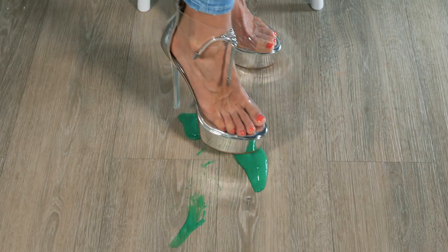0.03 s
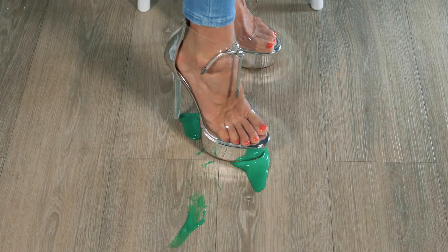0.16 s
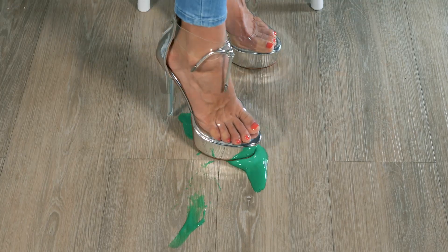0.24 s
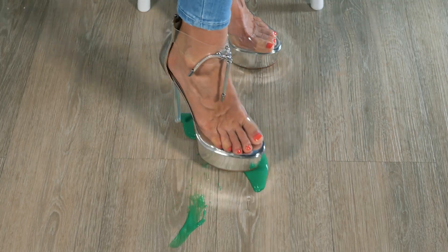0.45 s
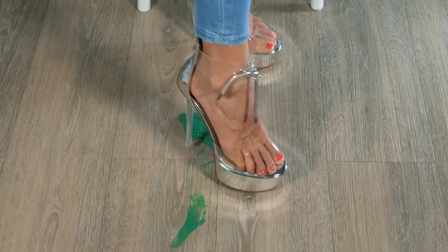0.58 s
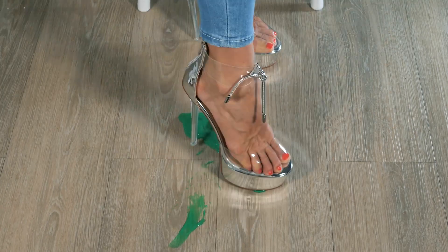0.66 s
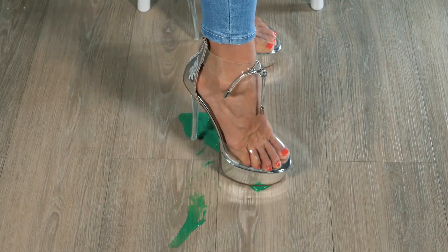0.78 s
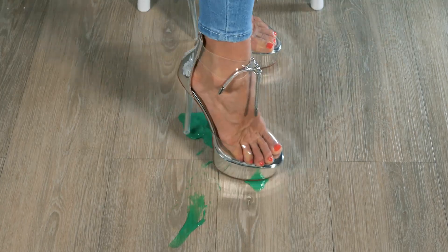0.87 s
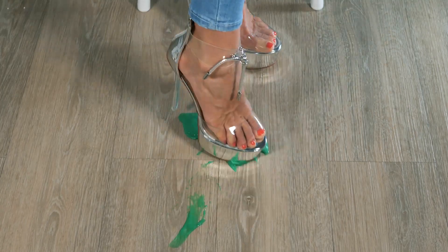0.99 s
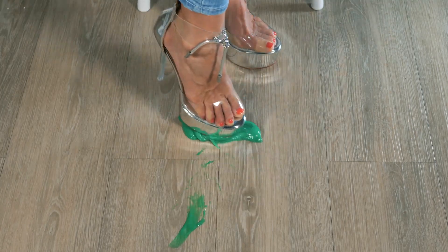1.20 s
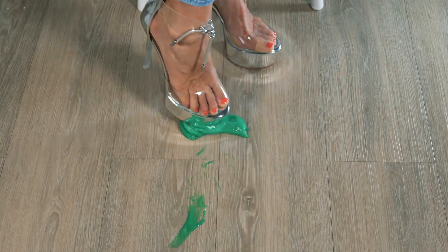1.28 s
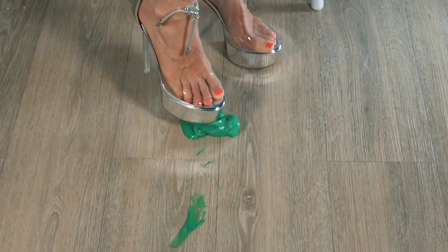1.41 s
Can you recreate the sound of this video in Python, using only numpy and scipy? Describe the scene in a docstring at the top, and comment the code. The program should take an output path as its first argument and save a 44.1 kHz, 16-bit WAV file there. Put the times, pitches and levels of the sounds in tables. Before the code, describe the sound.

Close up in a quiet room, a high-heeled shoe knocks hollowly on laminate and presses into faintly crackling slime. Two heel taps and a dry tick follow, and the slime lets go with tiny sticky pops.

```python
"""A hollow knock: a platform shoe comes down on a laminate floor, close to the microphone.
Its thin heel taps twice, setting the floor board ringing, and ticks as the foot rocks.
Slime under the sole crackles as it is pressed and lets go in small wet pops as the shoe lifts.
The place is a quiet, slightly live room that answers each sound over a faint rumble and hiss."""
import sys
import numpy as np
from scipy import signal
from scipy.fft import rfft, irfft
from scipy.io import wavfile
from scipy.ndimage import uniform_filter1d

SR = 44100
rng = np.random.default_rng(int(sys.argv[2]) if len(sys.argv) > 2 else 0)


def wav_out(sig):
    """Save sig, one row per channel (or a flat mono array), as 16-bit PCM at SR to the path in sys.argv[1]."""
    wavfile.write(sys.argv[1], SR, np.round(np.clip(np.atleast_2d(sig).T, -1, 1) * 32767).astype(np.int16))


N = 63945


def amp(db):
    return 10 ** (np.asarray(db) / 20)


def curve(points, hz):
    """Joins (f/Hz, value) points on a log-frequency axis."""
    f, value = np.transpose(points)
    return np.interp(np.log(hz + 1), np.log(f + 1), value)


def add(mix, start_s, sound):
    part = mix[max(round(start_s * SR), 0):][:len(sound)]
    part += sound[:len(part)]


def envelope(spectrum, bins):
    """Magnitude of a spectrum averaged over neighbouring bins."""
    return np.sqrt(abs(uniform_filter1d(abs(spectrum) ** 2, bins)) + 1e-12)


def min_phase(gain):
    """Causal spectrum with the given magnitude."""
    return np.exp(signal.hilbert(np.log(np.r_[gain, gain[-2:0:-1]])).conj())[:len(gain)]


def click(colour, decay_s, scatter, dull_db=0, size=4096):
    """One sharp contact and a scatter of smaller ones, losing dull_db per octave above 1 kHz."""
    t, hz = np.arange(size) / SR, np.fft.rfftfreq(size, 1 / SR)
    burst = rng.standard_normal(size) * np.exp(-t / decay_s)
    burst *= scatter / np.linalg.norm(burst)
    burst[0] += 1
    spectrum = rfft(burst)
    gain = amp(curve(colour, hz) - dull_db * np.log2(np.maximum(hz / 1000, 1)))
    return irfft(spectrum * min_phase(gain / envelope(spectrum, bins=31)))[:size // 2]


def ring(modes, rise_s):
    """A struck body: dying sines that swell over the contact time."""
    t = np.arange(SR // 2) / SR
    sines = sum(amp(db - 60 * t / t60) * np.sin(2 * np.pi * hz * t) for hz, db, t60 in modes)
    return (1 - np.exp(-t / rise_s)) * sines


# Spectrum of the still room: f/Hz, relative level/dB
ROOM_TONE = [(12, -35), (20, 2), (43, -2.5), (97, -5.5), (183, -12), (398, -19), (571, -21.5), (638, -23),
             (8160, -35.5), (12700, -37), (15000, -57)]
def room_tone(level_db=-67.5, width=0.69):
    """Faint rumble and hiss all around the microphone."""
    colour = amp(curve(ROOM_TONE, np.fft.rfftfreq(N, 1 / SR)))
    mid, side = irfft(rfft(rng.standard_normal((2, N))) * colour, N)
    stereo = mid + width * np.array([side, -side])
    return amp(level_db) * stereo / stereo.std()


# Decay of the room's tail: f/Hz, t60/s
TAIL_T60 = [(150, .36), (380, 0.34), (520, 0.36), (800, 0.31), (1400, 0.4254), (2100, 0.36), (3700, 0.35),
            (5000, 0.39), (7000, .23), (12000, 0.57)]
# Tail against the direct sound at the microphone: f/Hz, level/dB
TAIL_LEVEL = [(100, -15), (200, -4), (330, -6), (420, -11), (520, -2.5), (720, -4), (1400, -3), (2100, -5),
              (3700, -8), (4700, -9), (7000, -7.5), (12000, -17.5)]
# Stereo spread of the tail: f/Hz, ratio of side to mid
TAIL_WIDTH = [(200, 0.31), (380, 0.49), (480, 0.96), (700, 0.57), (3000, .4), (10000, 1.4)]
# Lean of the tail to the right: f/Hz, share
TAIL_LEAN = [(280, 0.047), (380, 0.32), (500, .4), (650, 0), (2000, 0), (10000, .05)]
def room(dry, t60_share=1, size=32768):
    """Direct sound from close by, quick reflections off shoe and floor, then the room's tail."""
    build_s, early_s, early_db, early_width = 0.006, 0.0094, -5, 0.3
    t, hz = np.arange(size) / SR, np.fft.rfftfreq(size, 1 / SR)
    band_hz, frame_s, noise = signal.stft(rng.standard_normal((2, size)), SR, nperseg=256)
    t60 = t60_share * curve(TAIL_T60, band_hz)[:, None]
    tails = signal.istft(noise * amp(-60 * frame_s / t60), SR, nperseg=256)[1][:, :size]
    tails *= 1 - np.exp(-(t / build_s) ** 2)
    tail_gain = amp(curve(TAIL_LEVEL, hz))
    tail, side_tail = (z * min_phase(tail_gain / envelope(z, bins=51)) for z in rfft(tails))

    early = rng.standard_normal((2, size)) * (rng.random((2, size)) < .08)  # sparse echoes
    early *= np.exp(-t / early_s) * (t > .001)
    early = signal.lfilter(*signal.butter(2, 800, "high", fs=SR), early)
    early_mid, early_side = rfft(early * amp(early_db) / np.linalg.norm(early, axis=1, keepdims=True))
    near = (1 + early_mid) * min_phase(1 / envelope(1 + early_mid, bins=181))  # broadly flat

    side = early_width * early_side + side_tail * curve(TAIL_WIDTH, hz) - tail * curve(TAIL_LEAN, hz)
    response = irfft(near + tail + np.array([side, -side]))[:, :size * 3 // 4]
    return signal.fftconvolve(dry[None], response, axes=1)[:, :N]


def pop(hz, cycles, rise_cycles=0.4294, glide=0.03):
    """A tiny cavity opens and rings for a few cycles, rising slightly in pitch."""
    turns = np.arange(1024) / SR * hz
    shape = (1 - np.exp(-(turns / rise_cycles) ** 2)) * np.exp(-turns / cycles)
    bend = 1 + glide * np.tanh(turns / (2 * cycles))
    wave = shape * np.sin(2 * np.pi * turns * bend)
    return wave / (abs(wave).max() + 1e-12)


# Air pockets bursting under the sole: t/s, peak level/dB, f/Hz, decay/cycles
AIR_POCKETS = [(0.214, -61, 5930, .7), (0.2218, -22.5, 4270, 1.7), (0.2480, -28, 3630, 1.4),
               (0.2747, -26.5, 4210, 3.3), (0.2738, -29, 2380, 1.6), (0.2818, -35.5, 6100, 0.61),
               (0.304, -36, 4730, 0.42), (0.3056, -39, 8950, 3.2), (0.3247, -35.5, 3060, 0.84),
               (0.3882, -45.5, 6050, 1.5), (0.4233, -30, 1830, 0.87), (0.4308, -43, 2500, 0.59),
               (0.4368, -41.5, 4670, 1.2), (0.9981, -53.5, 4646, 1.2), (1.0041, -54, 3000, 0.49),
               (1.0045, -63, 877, 1), (1.0377, -54, 7000, .7), (1.0423, -52, 5000, 1),
               (1.0440, -57, 535, 1.47), (1.0453, -46, 1717, 4.5), (1.0525, -53, 790, 0.44),
               (1.0525, -44.5, 2090, 2.3), (1.0542, -34, 5480, 1.4), (1.0833, -55, 8000, 1.2),
               (1.1095, -33, 3897, 1.8), (1.1112, -38.5, 2070, 0.93), (1.112, -36, 10000, 0.82),
               (1.1135, -33.5, 4540, 0.35), (1.1230, -29, 10900, 1.8), (1.2284, -51, 8160, 2.5),
               (1.3547, -55, 10500, 2)]
# Spells of sticky crackle: t/s, length/s, level/dB
CRACKLE_SPELLS = [(0.19, 0.01, -45.5), (0.206, 0.17, -49), (1.022, 0.12, -55), (1.176, 0.14, -76)]
def slime(grains_per_s=400, low_hz=1800, high_hz=9000, spread_db=2, fade_db=6):
    """Slime is pressed and peeled off the floor: distinct pops over a fine random crackle."""
    out = np.zeros(N)
    for start, db, hz, cycles in AIR_POCKETS:
        add(out, start, amp(db) * pop(hz, cycles))
    for start, length, db in CRACKLE_SPELLS:
        for progress, pitch, chance in rng.random((200, 3))[:int(length * grains_per_s)]:
            grain_db = db + spread_db * min(-np.log(chance), 3) - fade_db * progress
            grain_hz = low_hz * (high_hz / low_hz) ** pitch
            add(out, start + progress * length, amp(grain_db) * pop(grain_hz, cycles=0.71))
    return out


# Light contacts of the heel: t/s, level/dB
ROCKING_TICKS = [(0.682, -24.5), (0.8407, -1.5)]
# Spectrum of one tick: f/Hz, level/dB
TICK_SPECTRUM = [(200, -49), (450, -24.5), (800, -32.5), (1450, -12.5), (2200, -30), (3000, -21),
                 (3900, -23.5), (4650, -9.5), (5300, -26), (6600, -13.5), (9000, -22.5), (11500, -18.5),
                 (13000, -47)]
def heel_ticks():
    """The heel ticks drily as the foot rocks."""
    out = np.zeros(N)
    for start, db in ROCKING_TICKS:
        add(out, start, amp(db) * click(TICK_SPECTRUM, decay_s=0.0012, scatter=0.99))
    return out


# Heel on laminate: t/s, click level/dB, ring level/dB, knock level/dB, thud level/dB, dulling/(dB/oct)
TAPS = [(0.4536, 2.5, -26, -0.5, 5.5, 2), (0.5668, -7, 5, -12, -45, 4.5)]
# Spectrum of the heel's contact: f/Hz, level/dB
TAP_SPECTRUM = [(50, -16.5), (200, -34.5), (400, 12.5), (800, -9), (1400, 3.5), (2100, 0), (2600, 0),
                (2900, 6), (3450, 0.5), (4050, 0.5), (4700, -5.5), (7500, -11.5), (11500, -2.5),
                (13500, -25), (15000, -46)]
# Modes of the plastic tip, the heel, and the board's knock and low thud: f/Hz, level/dB, t60/s
TIP_CLACK = [(2800, -25.5, 0.011), (3890, -33.5, 0.0091)]
HEEL_RING = [(1152, -48.5, 0.046), (1382, -39.5, 0.031), (1510, -49, .04)]
BOARD_KNOCK = [(457.6, -28, 0.078), (472.2, -44, 0.2), (523.3, -42.5, 0.17)]
BOARD_THUD = [(226, -36.5, 0.034), (292, -34.5, 0.024)]
def heel_taps():
    """The hard heel tip strikes the floor board twice, softer and duller the second time."""
    out = np.zeros(N)
    for start, click_db, ring_db, knock_db, thud_db, dull_db in TAPS:
        contact = click(TAP_SPECTRUM, decay_s=0.0013, scatter=1.8, dull_db=dull_db)
        add(out, start, amp(click_db) * contact)
        add(out, start, amp(click_db - 2 * dull_db) * ring(TIP_CLACK, rise_s=0.00029))
        add(out, start, amp(ring_db) * ring(HEEL_RING, rise_s=0.0037))
        add(out, start, amp(knock_db) * ring(BOARD_KNOCK, rise_s=0.0043))
        add(out, start, -amp(thud_db) * ring(BOARD_THUD, rise_s=0.0023))
    return out


# Spectrum of the sole's crack on the laminate: f/Hz, level/dB
SOLE_SPECTRUM = [(40, -37.5), (100, -11.5), (220, -1), (800, 2), (1500, 3.5), (2000, 0), (2500, 2.5),
                 (3100, -6), (4200, 3.5), (5700, -7), (7500, -4), (11000, -11.5), (13500, -21),
                 (15500, -50.5)]
# Hollow modes of platform and floor: f/Hz, level/dB, t60/s
PLATFORM_RING = [(421.6, -8.5, 0.043), (358, -20.5, 0.029), (381.6, -32.5, .4), (433, -35, .33),
                 (220.5, -35.5, .14), (511, -35.5, .15), (1019, -31.5, .07), (1590, -31, 0.074),
                 (2450, -26, 0.01), (3730, -26.5, .015)]
def sole_knock(start_s=0.2078, rise_s=0.0012):
    """The sole lands near the microphone with a crack, and platform and floor ring."""
    out = np.zeros(N)
    add(out, start_s, click(SOLE_SPECTRUM, decay_s=0.00078, scatter=1.5))
    add(out, start_s + rise_s / 2, -ring(PLATFORM_RING, rise_s))
    return out


def scene():
    """Heavy blows and light sounds from the same spot on the floor, over the room tone."""
    bass_cut = signal.butter(3, 150, "high", fs=SR)  # shoe and floor radiate little below 150 Hz
    blows = room(signal.lfilter(*bass_cut, sole_knock() + heel_taps()))
    light = room(heel_ticks() + slime(), t60_share=0.65)  # the floor stays still: a shorter tail
    return blows + light + room_tone()


def record(dry):
    """The microphone chain passes sound up to 14.7 kHz."""
    band_limit = signal.firwin(255, 14700, window=("kaiser", 9), fs=SR)
    return signal.oaconvolve(dry, band_limit[None], "same")


dry = scene()
out = record(dry)
wav_out(out)
```